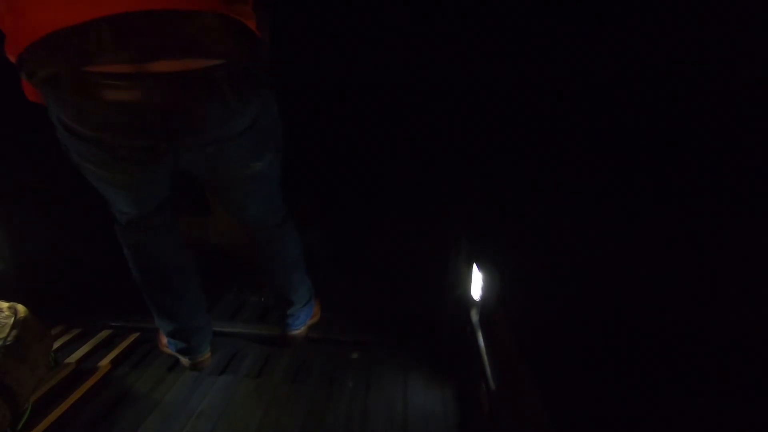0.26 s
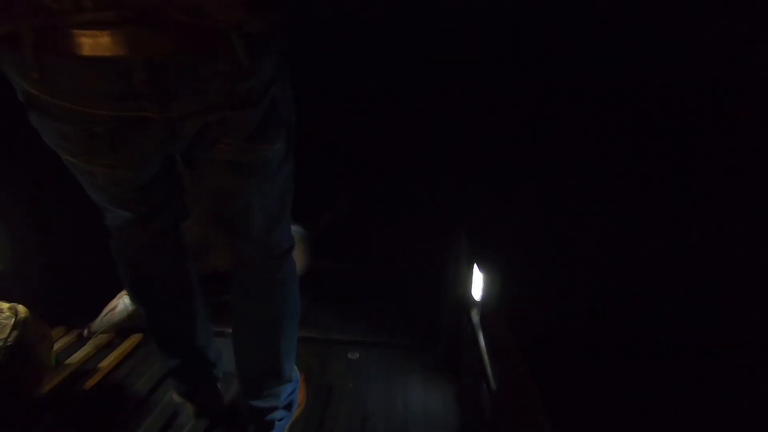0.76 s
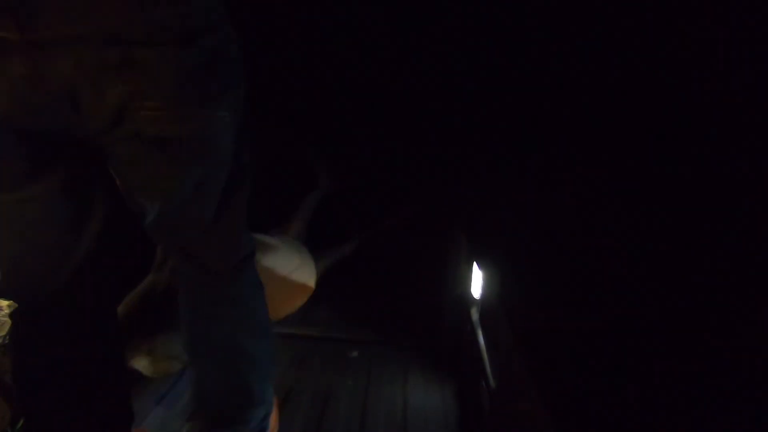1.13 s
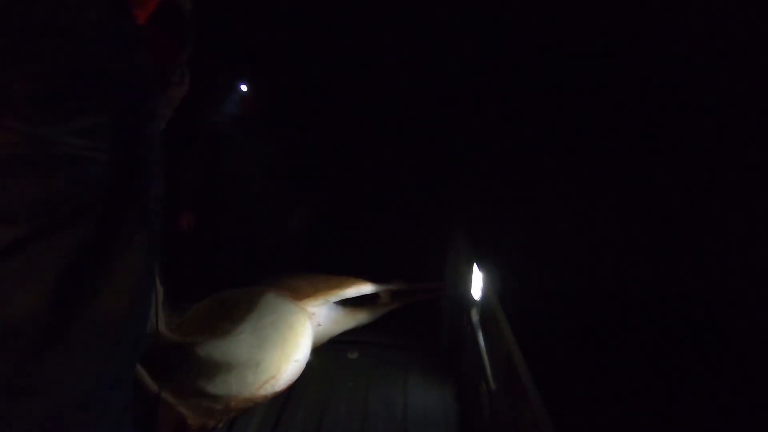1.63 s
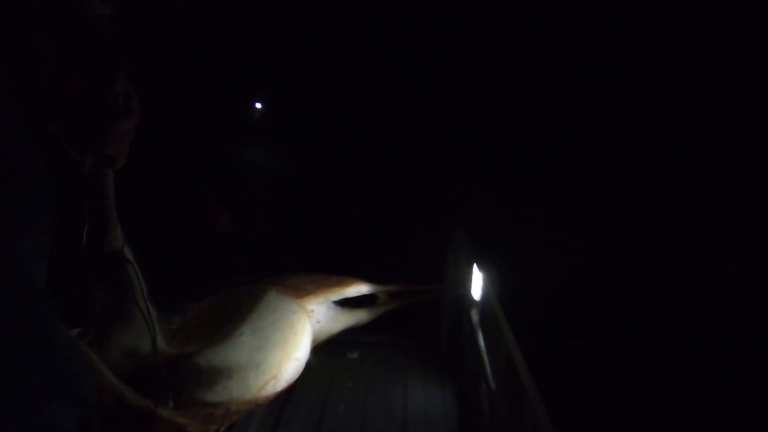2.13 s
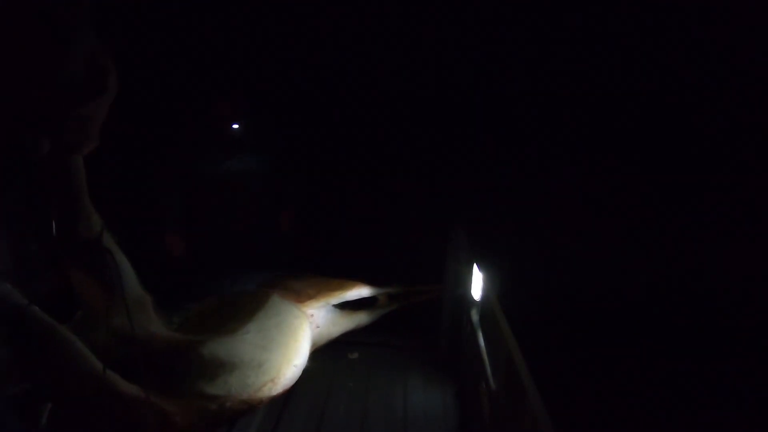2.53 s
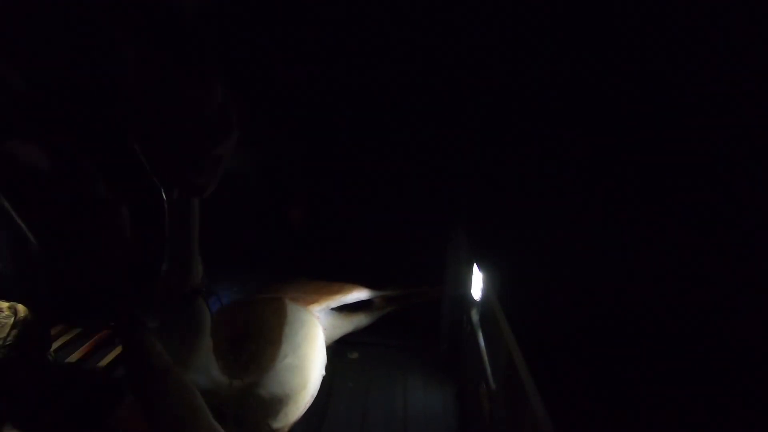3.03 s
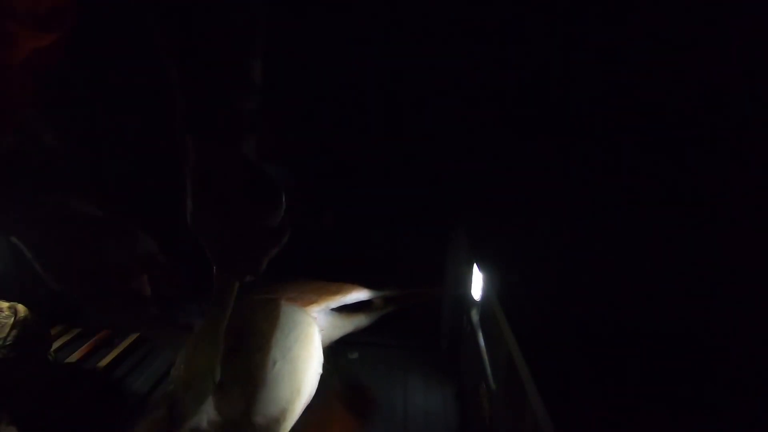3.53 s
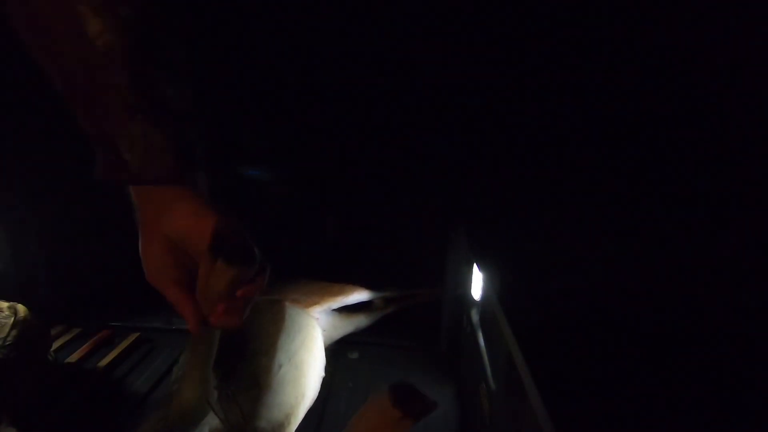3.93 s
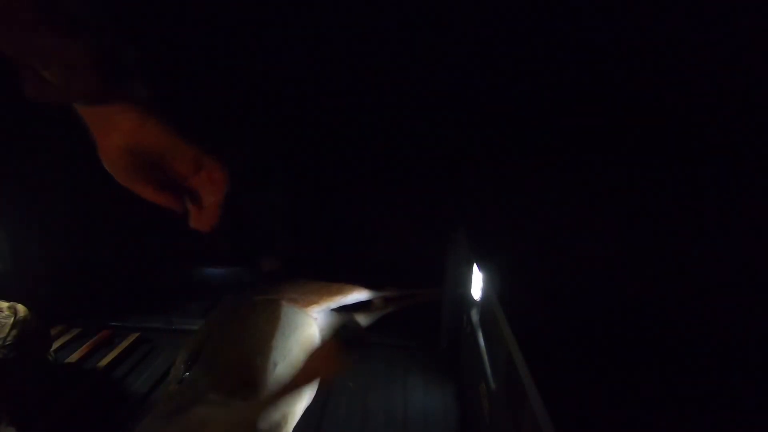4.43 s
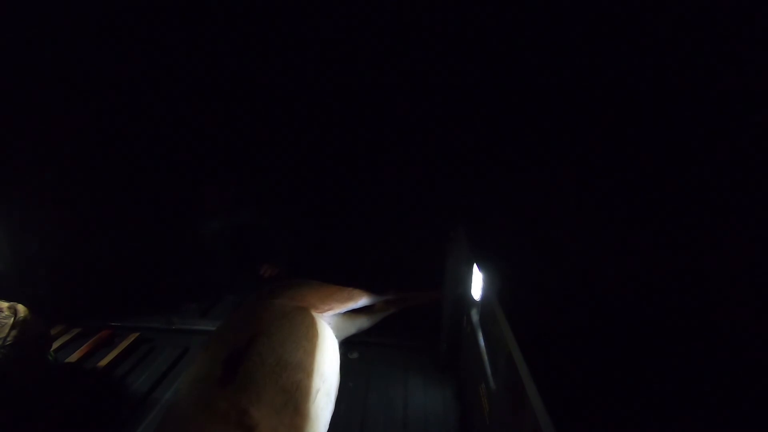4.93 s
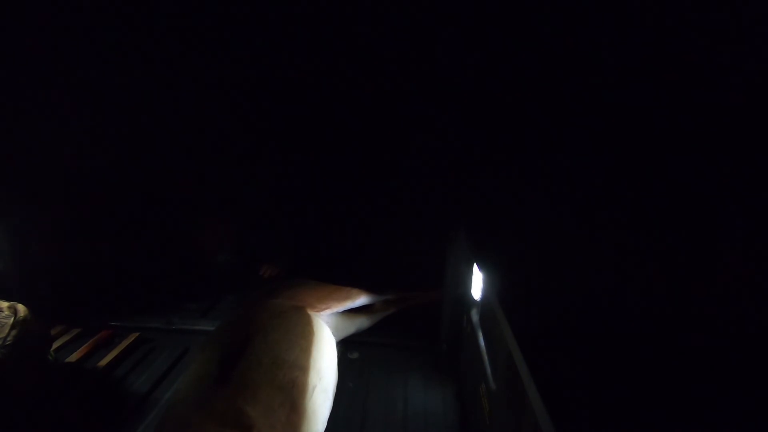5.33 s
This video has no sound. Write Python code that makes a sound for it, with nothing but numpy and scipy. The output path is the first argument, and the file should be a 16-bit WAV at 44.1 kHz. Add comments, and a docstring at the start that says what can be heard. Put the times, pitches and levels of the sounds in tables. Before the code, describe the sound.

Low booming thuds and ringing floor panels, mixed with brief sole and hide scrapes and hard heel or hoof cracks, crowd the first two seconds. Sparse soft bumps and faint clothing follow. Late on, a hoof hits the bed with a loud bang and bounces. Outdoors, close stereo microphones, brief side-wall reflections, very quiet night.

```python
"""A deer carcass is hauled onto an open pickup bed at night, heard from close by in stereo.
The body and boots thump on the ribbed bed as ringing modes; hoof and heel clack as short cracks.
Then a leg is let go: the hoof bangs on the bed, skids and bounces.
Soles, hoof and hide scrape as shaped noise, clothes rustle, and the truck rocks and murmurs.
The side walls answer briefly, and a quiet night lies behind it all."""
import sys
import numpy as np
from scipy import signal
from scipy.fft import rfft, irfft, next_fast_len
from scipy.io import wavfile
from scipy.ndimage import uniform_filter1d, map_coordinates

SR = 44100
rng = np.random.default_rng(int(sys.argv[2]) if len(sys.argv) > 2 else 0)


def store_wav(level_fs):
    """Save 16-bit WAV to argv[1]."""
    pcm = np.round(np.clip(np.atleast_2d(level_fs), -1, 1) * 32767)
    wavfile.write(sys.argv[1], SR, pcm.T.astype(np.int16))


N = 245504


def amp(db):
    """Decibels to gain."""
    return 10 ** (np.asarray(db) / 20)


def unit(x):
    """Scale to rms 1."""
    return x / np.sqrt(np.mean(x ** 2) + 1e-20)


def early_unit(x):
    """Scale so that the first 25 ms have rms 1."""
    return x / np.sqrt(np.mean(x[..., :SR // 40] ** 2) + 1e-20)


def along(points, hz):
    """Read (Hz, value) points on a log frequency axis."""
    f, value = np.transpose(points)
    return np.interp(np.log(hz + 1), np.log(f + 1), value)


def shaped(points):
    """Gain by frequency from (Hz, dB) points."""
    return lambda hz: amp(along(points, hz))


def wobble(rate, size=N):
    """A smooth random curve, rate knots a second."""
    knots = rng.standard_normal(N // 8)
    return map_coordinates(knots, [np.arange(size) * rate / SR], mode="wrap")


def filtered(x, response):
    """Multiply the spectrum of x by a response of frequency."""
    m = next_fast_len(x.shape[-1] + 8192)  # padding keeps the tail from wrapping round
    return irfft(rfft(x, m) * response(np.fft.rfftfreq(m, 1 / SR)), m)[..., :x.shape[-1]]


# how alike the two microphones hear a noise: pitch_hz, likeness (1 = mono)
STEREO_LIKENESS = [(100, 0.72), (350, 0.97), (600, 0.71), (1100, 0.18), (2200, 0.78), (6000, 0.41),
                   (12000, 0.21)]


def noise(colour, size=N, likeness=1):
    """Stereo noise of rms 1 with the given gain by frequency; each band has its own width."""
    def mid_side(hz):
        turn = np.arccos(np.clip(likeness * along(STEREO_LIKENESS, hz), 0, 1)) / 2
        return colour(hz) * np.array([np.cos(turn), np.sin(turn)])

    mid, side = filtered(rng.standard_normal((2, size)), mid_side)
    return unit(np.array([mid + side, mid - side]))


def pan(db):
    """Left and right gains for a level difference; positive is louder on the left."""
    return amp([[db / 2], [-db / 2]])


def add(track, s, sound):
    """Mix a sound into the track at time s."""
    part = track[:, max(round(s * SR), 0):][:, :sound.shape[-1]]
    part += sound[..., :part.shape[1]]


def patchy(x, depth_db):
    """Shifting folds and contact points colour a rustle differently from moment to moment."""
    z = signal.stft(x, nperseg=1024)[2]
    field = uniform_filter1d(rng.standard_normal(z.shape[1:]), size=7, axis=0)
    field = uniform_filter1d(field, size=12, axis=1)
    return signal.istft(z * amp(depth_db * unit(field)))[1][:, :N]


# colour of the night around the truck: pitch_hz, level_db (relative)
NIGHT_COLOUR = [(15, -33), (25, -14.5), (69, -8.5), (250, -6), (450, -18), (729, -14.5), (811, -15),
                (1060, -22), (1500, -12), (2070, -21), (3440, -22.5), (4620, -29), (7280, -29.5),
                (15000, -51.5)]


def night():
    """The quiet night is a faint, steady stereo noise."""
    return amp(-64.5) * noise(shaped(NIGHT_COLOUR))


def walls(x, t60=0.13, delay=0.0017):
    """The side walls of the bed scatter a short answer, a decaying noise tail."""
    t = np.arange(SR // 3) / SR
    colour = shaped([(100, -30.5), (400, 7), (1500, 7), (4000, -13.5), (10000, -5)])
    tail = noise(colour, size=len(t)) * amp(-60 * t / t60) * (t > delay)
    return signal.fftconvolve(x, tail / np.linalg.norm(tail[0]), axes=1)[:, :N]


# movements of the person on the bed: start_s, fastest_s, end_s, level_db (relative motion)
PERSON_MOVES = [(-.3, .3, 0.67, -55), (0.945, 1.35, 1.69, -59), (2.358, 2.88, 3.39, -64.5),
                (3.263, 3.354, 3.75, -67), (4.281, 4.46, 4.7, -67), (4.68, 5.0, 5.06, -60.5)]


def movement(edge_db=-9):
    """Gain of the person's motion: each move swells to its fastest moment and ebbs."""
    t = np.arange(N) / SR
    power = 0
    for start, top, end, db in PERSON_MOVES:
        before = (top - t) / max(top - start, .01)
        after_top = (t - top) / max(end - top, .01)
        away = np.maximum(before, after_top)  # 0 when fastest, 1 at the start and end
        power = power + amp(db + edge_db * away ** 1.32) ** 2
    return np.sqrt(power)


# colour of the rubbing cloth: pitch_hz, level_db (relative)
CLOTH_COLOUR = [(350, -26), (600, -4.5), (694, -5), (1040, -2.5), (1140, -5), (1340, -2.5), (1470, -4),
                (1990, -5.5), (2240, -8), (3080, -7.5), (3330, -7), (5070, -16.5), (7440, -19.5),
                (12300, -38.5), (14000, -65)]


def clothes(motion):
    """Jeans and jacket rub in small, uneven rustles that follow the motion."""
    folds = patchy(noise(shaped(CLOTH_COLOUR)), depth_db=1.4)
    rustle = unit(folds * amp(1.6 * wobble(120)))
    return amp(8) * motion * pan(-1.8) * rustle


# modes of the bed floor: pitch_hz, level_db (relative), t60_s
BED_MODES = [(39, -12.5, 0.13), (67.44, -11.5, .55), (76.4, 9, 0.26), (114.6, 7.5, 0.27), (132, 6.5, 0.43),
             (176, 0.5, 0.13), (203, -2.5, 0.053), (225, -1, 0.36), (250, -0.5, 0.11), (297.5, 3, 0.15),
             (329.4, -2, 0.29), (370.2, -3, 0.38), (458, -6, 0.04), (529.3, 1, 0.09), (576.7, -9, 0.23),
             (614, -7.5, 0.16), (649, -10, 0.17), (783, -7.5, 0.08), (886, -15.5, 0.29), (1075, -5, 0.077),
             (1124, -9.5, 0.16)]


def bed_colour(hz, damping=4):
    """The bed's modes, broadened by the weight that lies on them."""
    return np.sqrt(sum(amp(db) ** 2 / (1 + ((hz - f) * t60 / damping) ** 4) for f, db, t60 in BED_MODES))


def after(times, levels_db, fall_db_per_s, rise=0.012):
    """Gain of a motion that each blow starts and that then dies at a steady rate."""
    power, t = np.zeros((1, N)), np.arange(SR) / SR
    tail = (amp(-fall_db_per_s * t) * (1 - np.exp(-t / rise))) ** 2
    for s, db in zip(times, levels_db):
        add(power, s, amp(db) ** 2 * tail)
    return np.sqrt(power[0])


def sway(motion, rock_db=-10.5, rock_fall_db_per_s=86.5, murmur_db=-19.5, murmur_fall_db_per_s=110.5,
         lean_db=-6, shift_db=13):
    """Every blow leaves the truck rocking on its springs and the panels murmuring; shifting weight stirs both."""
    s, boom_db, panel_db, _, knock_db, _ = np.transpose(BLOWS)
    rocking = noise(shaped([(12, -31.5), (25, -15.0), (36, 0), (52, 25.5), (70, -12), (110, -37.5), (400, -100)]))
    panels = shaped([(50, -6), (125, -3), (250, 0), (600, -14), (1300, -22)])
    murmur = noise(lambda hz: bed_colour(hz) * panels(hz))
    rocked = after(s, boom_db + rock_db, rock_fall_db_per_s)
    blow_db = (panel_db + np.maximum(boom_db, knock_db)) / 2
    stirred = after(s, blow_db + murmur_db, murmur_fall_db_per_s)
    rock_gain = np.hypot(rocked, amp(lean_db) * motion)
    murmur_gain = np.hypot(stirred, amp(shift_db) * motion)
    return rock_gain * rocking + murmur_gain * murmur


# resonances of the ribbed liner: pitch_hz, width_hz, level_db (relative)
LINER_RIBS = [(1188, 11, -7), (1224, 30, 2), (1454, 25, -4), (1639, 18, 0), (1830, 34, -26.5),
              (1886, 81, -7.5), (2180, 8.3, -4.5), (2435, 11, -7), (2550, 210, -9.5), (2814, 60, -2.5),
              (3046, 43, -11.5), (3176, 26, -2.5), (3540, 31, -5.5), (4000, 180, -7.5)]


def liner(hz, lift=0.31):
    """The ribbed surface favours its own resonances."""
    peaks = sum(amp(db / 2) / (1 + (2 * (hz - f) / width) ** 2) for f, width, db in LINER_RIBS)
    return 1 + lift * peaks


def grit(rate=130, spread_db=3, t60=0.056):
    """Specks of dirt catch under the body and let go, giving its hiss a spiky gain of rms 1."""
    strength = amp(spread_db * np.minimum(rng.exponential(size=N), 3))
    catches = (rng.random(N) < rate / SR) * strength
    return unit(signal.fftconvolve(catches, amp(-60 * np.arange(SR // 20) / SR / t60))[:N])


# colour of the sliding coat: pitch_hz, level_db (relative)
HIDE_COLOUR = [(240, -23), (400, -0.5), (445, -39), (745, -4), (1040, -13.5), (3190, -25), (8690, -41),
               (12500, -48.5), (15000, -70.5)]
# slides of the body, six pulls and then the leg sinking down:
# start_s, end_s, shudder_db (relative), hide_db (relative)
BODY_SLIDES = [(0.116, 0.456, -33, -48), (0.565, 0.723, -20, -50), (0.843, 1.01, -18.5, -43),
               (1.193, 1.514, -33.5, -48), (1.573, 1.632, -12.5, -36), (1.663, 1.75, -22.5, -49.5),
               (4.592, 4.71, -20, -68), (4.757, 4.89, -31.5, -72.5)]


def drag(lumps_db=2, lumps=14, rise_db_per_s=499, fall_db_per_s=200.5):
    """The sliding body makes the bed shudder while its coat hisses over the liner."""
    t = np.arange(N) / SR
    start, end, shudder_db, hide_db = np.transpose(BODY_SLIDES)[:, :, None]
    # getting under way, then coming to rest
    speed_db = -rise_db_per_s * np.maximum(start - t, 0) - fall_db_per_s * np.maximum(t - end, 0)
    low = shaped([(50, -12), (125, 0), (300, -4), (600, -15), (1300, -24)])
    shudder = noise(lambda hz: bed_colour(hz) * low(hz))
    shudder = unit(shudder * amp(lumps_db * wobble(lumps)))
    coat = patchy(noise(lambda hz: shaped(HIDE_COLOUR)(hz) * liner(hz)), depth_db=2.5)
    hide = unit(coat * (amp(2.9 * wobble(250)) + amp(-2.0) * grit()))
    shudder_gain = amp((speed_db + shudder_db).max(axis=0) - 7.5)
    hide_gain = amp((speed_db + hide_db).max(axis=0) + 2.5)
    return shudder_gain * shudder + hide_gain * pan(-2.7) * hide


# colour of rubbing sole and hoof: pitch_hz, level_db (relative)
FRICTION_COLOUR = [(260, -23.5), (500, -1), (1100, -5), (1800, -10), (2800, -15), (4500, -21),
                   (6300, -22.5), (8200, -28.5), (10000, -36.5), (13000, -51.5), (16000, -75.5)]
# sliding strokes of sole and hoof: start_s, length_s, level_db (relative), start_pitch_hz, end_pitch_hz,
# focus_db (lift of the rasp at its centre), side_db (positive is left)
STROKES = [(0.36, 0.077, -31.5, 4240, 3930, 11, 0), (0.527, .033, -35.5, 3070, 3000, 6, -1),
           (.568, 0.046, -20.5, 1710, 1570, 10, -3), (0.834, 0.088, -19, 2700, 2120, 11.5, -2),
           (0.936, 0.073, -31, 1800, 1220, 8.5, -1.5), (1.401, 0.045, -31.5, 2200, 2400, 2, -3),
           (1.593, .052, -26, 3150, 2880, 9.5, -1), (1.647, 0.12, -27, 2480, 1200, 13, -2),
           (2.337, 0.076, -41.5, 1300, 2580, -1.5, -4.5), (4.569, .06, -34, 529, 594, 16, -3),
           (4.606, 0.034, -20, 1550, 2330, 8, -5.5)]


def scrapes(octaves=0.47, grit_db=-0.5, slips=600, judder_db=2, judders=110, start_db=-11, end_db=-10,
            press_share=0.28, release=0.011):
    """Sole and hoof slip in tiny jerks over the ribs; the centre of the rasp glides along the stroke."""
    out, t = np.zeros((2, N)), np.arange(SR // 4) / SR
    colour = lambda hz: shaped(FRICTION_COLOUR)(hz) * liner(hz, lift=1.1)
    for s, length, db, start_hz, end_hz, focus_db, side_db in STROKES:
        rasp = noise(colour, size=len(t), likeness=amp(-abs(side_db) / 2))
        hz, when, z = signal.stft(rasp, SR, nperseg=256)
        centre = np.interp(when, [0, length], [start_hz, end_hz])
        distance = np.log2((hz[:, None] + 1) / centre) / octaves
        focus = amp(focus_db * np.exp(-.5 * distance ** 2))
        rasp = signal.istft(z * focus)[1][:, :len(t)]
        rasp *= amp(grit_db * wobble(slips, size=len(t)) + judder_db * wobble(judders, size=len(t)))
        rasp /= np.std(rasp[:, t < max(length, .01)])
        # pressure peaks early in the stroke
        pressure = amp(np.interp(t, [0, press_share * length, length], [start_db, 0, end_db]))
        contact = (1 - np.exp(-t / .002)) * np.exp(-np.maximum(t - length, 0) / release)
        add(out, s, amp(db - 0.5) * pan(side_db) * rasp * pressure * contact)
    return out


# colour of a hard contact: pitch_hz, level_db (relative)
HOOF_COLOUR = [(300, -22.5), (600, -1.5), (1100, -1.5), (1600, -13.5), (3200, -14.5), (4500, -17.5),
               (8200, -19.5), (10500, -41), (15000, -53)]
# hard contacts of hoof and heel: start_s, level_db (relative), brightness_hz, side_db (positive is left)
HARD_CONTACTS = [(.143, -21.5, 4050, 3), (0.201, -15, 2820, 1), (0.287, -21.5, 3000, 5),
                 (0.413, -9, 9200, -5), (0.464, -15, 1500, 4), (0.571, -4.5, 2965, -2),
                 (.675, -15, 2600, -2), (0.824, -6.5, 7160, -4), (1.032, -11.5, 2420, 1),
                 (1.277, -14.5, 1600, 0), (1.383, -10.5, 2050, -3), (1.496, -18.5, 1780, -6),
                 (1.543, -18.5, 5860, -4), (1.562, -3.5, 2850, -5), (2.33, -13, 3020, -5),
                 (4.591, -1.5, 14000, -15.5), (4.629, -2, 7300, -6.5), (4.756, -5, 3470, -5),
                 (4.808, -19, 1780, -6.5)]


def clacks(crack_t60=0.0036, crack_db=-8, scatter_db=-22, ribs_db=-19, ring_t60=0.097, ring_half_hz=9000):
    """A hard contact cracks sharply, then the ribs ring; a softer one is duller and rings longer."""
    out, t = np.zeros((2, N)), np.arange(SR // 4) / SR
    hz, _, level = np.transpose(LINER_RIBS)
    for s, db, bright_hz, side_db in HARD_CONTACTS:
        t60 = ring_t60 / (1 + bright_hz / ring_half_hz)
        crack = noise(shaped(HOOF_COLOUR), size=len(t), likeness=0.47) * amp(crack_db - 60 * t / crack_t60)
        scatter = noise(shaped(HOOF_COLOUR), size=len(t))
        # every rib mode reaches the two microphones with its own phase
        phase = rng.uniform(0, 2 * np.pi, (len(hz), 1)) + 1.68 * rng.standard_normal((2, len(hz), 1))
        gain = amp(level + 2 * rng.standard_normal(len(hz)))
        ribs = unit(gain @ np.sin(2 * np.pi * hz[:, None] * t + phase))
        fade = amp(-60 * t / t60) * (1 - np.exp(-t / 0.00094))
        ring = (amp(scatter_db) * scatter + amp(ribs_db) * ribs) * fade
        softness = signal.butter(2, min(bright_hz, SR / 3), fs=SR)  # low-pass
        add(out, s, amp(db) * pan(side_db) * signal.lfilter(*softness, crack + ring))
    return out


# soft, heavy blows on the bed: start_s, boom_db, panel_db, pitch_hz (of the panel), knock_db (all relative),
# follow_db (the arriving weight, relative to the first touch)
BLOWS = [(0.06, -16.5, -29, 130, -67, -24), (0.146, -14, -24.5, 159, -36.5, -0.5),
         (.195, -15, -21, 188.4, -43, -14), (.29, -20, -20, 228, -42, -11),
         (.331, -18, -21.5, 129.2, -47, -14), (.428, -15.5, -31.5, 134, -58, -19),
         (.574, -21, -16, 241, -20.5, 0.5), (0.674, -15.5, -19.5, 214, -27, -4.5),
         (.824, -13, -12, 159.7, -18.5, -7.5), (1.031, -10.5, -12.5, 205, -24.5, -16),
         (1.205, -24, -21, 150, -53.5, -9.5), (1.276, -42, -31.5, 277, -29.5, -17),
         (1.385, -18.5, -11.5, 259, -32, -10.5), (1.496, -12.5, -17, 191, -31, -17),
         (1.563, -11.5, -18, 142, -14.5, -7), (1.623, -10, -20, 248, -23, -5.5),
         (1.772, -22.5, -25.5, 158.5, -45, -18), (1.999, -31.5, -41, 143, -57, -10.5),
         (2.181, -48.5, -38.5, 210, -72, -16), (2.331, -16, -9, 223.5, -24, -16.5),
         (2.913, -10, -16, 194, -33.5, -5), (3.077, -26.5, -44, 200, -80, -12),
         (3.382, -48, -45, 228, -61, -15), (3.53, -24.5, -20.5, 220.4, -42, -25),
         (3.62, -29, -31.5, 157, -62, -11), (4.068, -45, -41.5, 211, -50, -22.5),
         (4.438, -51, -45, 251, -44.5, 1), (4.591, -10, -15, 196, -7.5, -5.5),
         (4.759, -20.5, -34.5, 232, -30.5, -17), (5.04, -29, -40, 200, -51, -16.5),
         (5.445, -52, -49, 200, -77, -14.5)]


def thumps(split_hz=95, knock_hz=420, octaves=1.0, push=0.0087, tap=0.00064, dent=0.0014, dulling=0.31,
           overtone=1.62, overtone_db=-9, overtone_growth=0.28, patch_t60=0.077, spread_db=-6,
           fuzz_db=-14, fuzz_t60=0.13, follow_s=0.029, rebound_s=0.091, rebound_db=-16.5):
    """Each blow booms the floor, rings the panel and knocks the high modes; weight follows, the floor rebounds."""
    out, t = np.zeros((2, N)), np.arange(SR // 2) / SR
    hz, level, t60 = np.transpose(BED_MODES)
    boom, knock = hz < split_hz, hz > knock_hz
    middle = ~boom & ~knock
    # the heavy floor gets moving more slowly than its panels
    rise_s = np.where(boom, push, tap)[:, None]
    fade = amp(-60 * t / t60[:, None]) * (1 - np.exp(-t / rise_s))
    rings = fade * np.sin(2 * np.pi * hz[:, None] * t)
    left_rings = fade * np.sin(2 * np.pi * hz[:, None] * t - .55)  # the left microphone lags in phase
    fuzz_fade = amp(-60 * t / fuzz_t60) * (1 - np.exp(-t / tap))
    for s, boom_db, panel_db, pitch_hz, knock_db, follow_db in BLOWS:
        spot = lambda f: np.exp(-.5 * (np.log2((f + 1) / pitch_hz) / octaves) ** 2)
        # a heavier blow brings out the overtone of the loaded patch
        upper = amp(overtone_db + overtone_growth * (panel_db + 13.5))
        plate = np.sin(2 * np.pi * pitch_hz * t) + upper * np.sin(2 * np.pi * overtone * pitch_hz * t)
        patch = early_unit(plate * amp(-60 * t / patch_t60) * (1 - np.exp(-t / dent)))
        for delay, force in (0, 1), (follow_s, amp(follow_db)):
            # each touch moves the modes with its own strengths, and signs above the boom
            sign = np.where(boom, 1, rng.choice([-1, 1], len(hz)))
            gain = amp(level + 3.0 * rng.standard_normal(len(hz))) * sign
            spread = early_unit((gain * spot(hz) * middle) @ rings)
            fuzz = early_unit(noise(spot, size=len(t)) * fuzz_fade)
            panel = patch + amp(spread_db) * spread + amp(fuzz_db) * fuzz
            # the softer the contact, the faster its knock falls off with each octave
            slope_db = dulling * min(knock_db - panel_db, 0) - 4.5
            high = gain * knock * amp(slope_db * np.log2(np.maximum(hz / knock_hz, 1)))
            rap = pan(-5) * early_unit(np.array([high @ left_rings, high @ rings]))
            floor = amp(boom_db - 5.0) * early_unit((gain * boom) @ rings)
            blow = floor + amp(panel_db - 4) * panel + amp(knock_db - 10.5) * rap
            add(out, s + delay, force * blow)
        add(out, s + rebound_s, amp(rebound_db) * floor)
    return out


def scene():
    """Everything happens on the open bed, over a quiet night."""
    motion = movement()
    contacts = thumps() + clacks() + scrapes()
    background = night() + amp(-17.0) * walls(contacts)
    return background + clothes(motion) + sway(motion) + drag() + contacts


def record(dry, top_hz=15500):
    """The recorder rounds off the highest peaks and cuts steeply above its band limit."""
    held = dry / (1 + np.abs(dry) ** 6) ** (1 / 6)
    return filtered(held, lambda hz: 1 / np.sqrt(1 + (hz / top_hz) ** 80))


dry = scene()
out = record(dry)
store_wav(out)
```